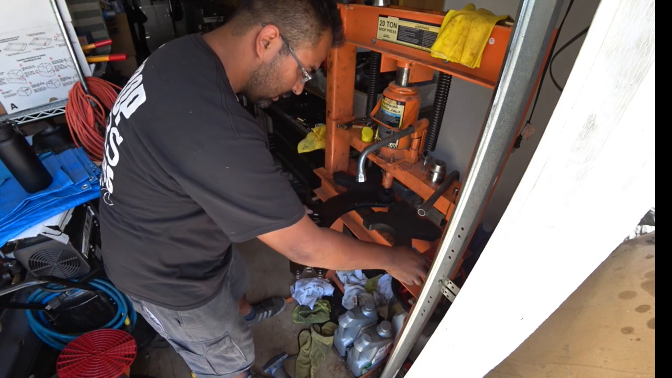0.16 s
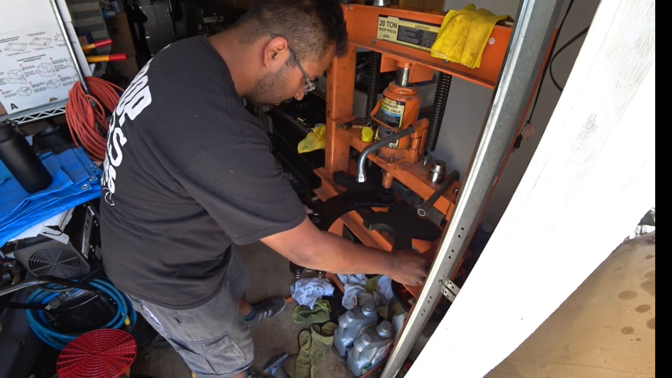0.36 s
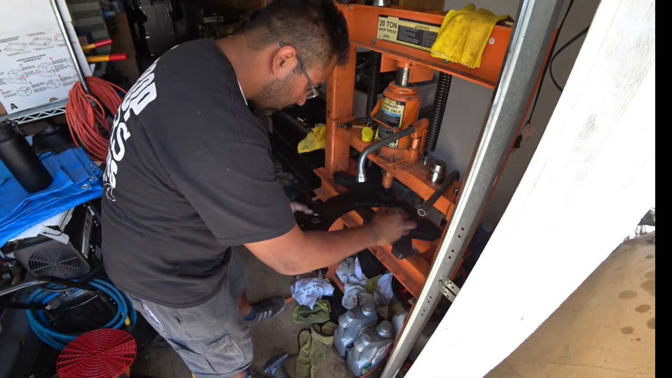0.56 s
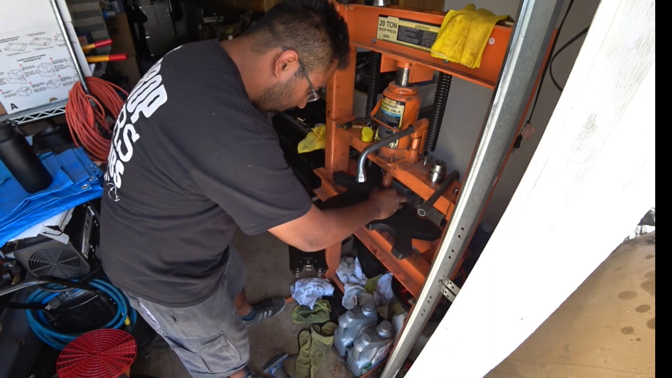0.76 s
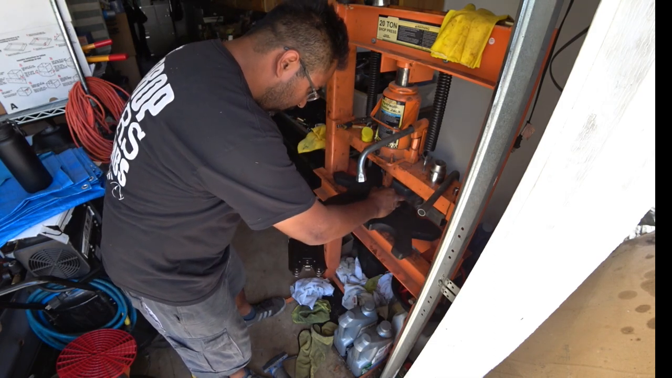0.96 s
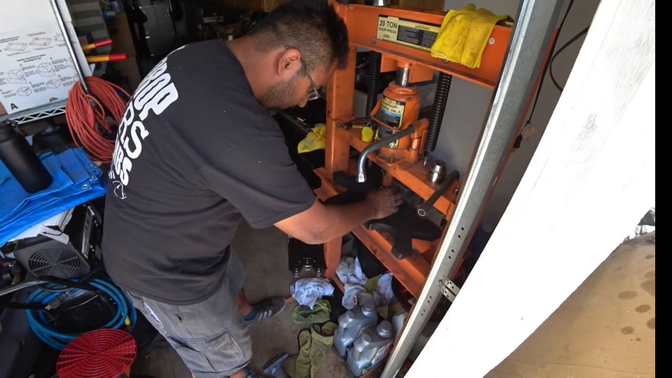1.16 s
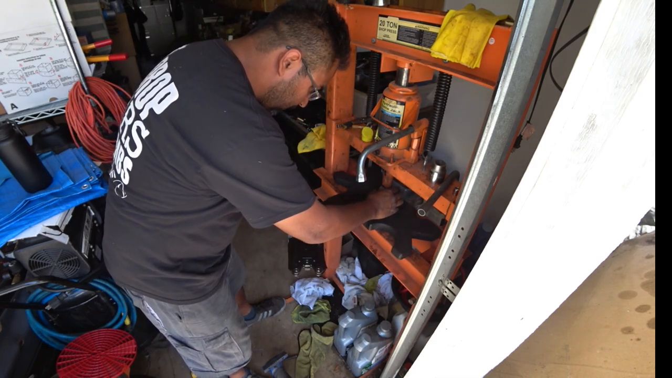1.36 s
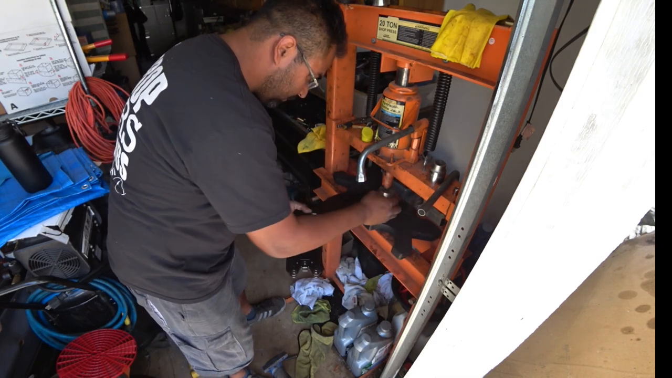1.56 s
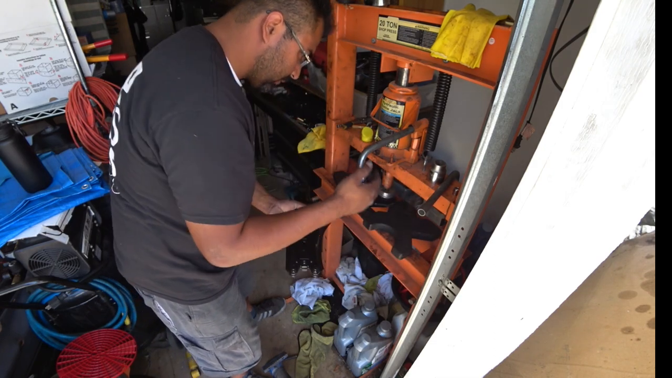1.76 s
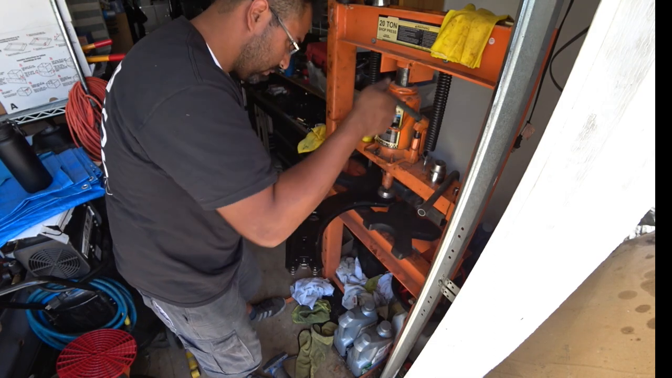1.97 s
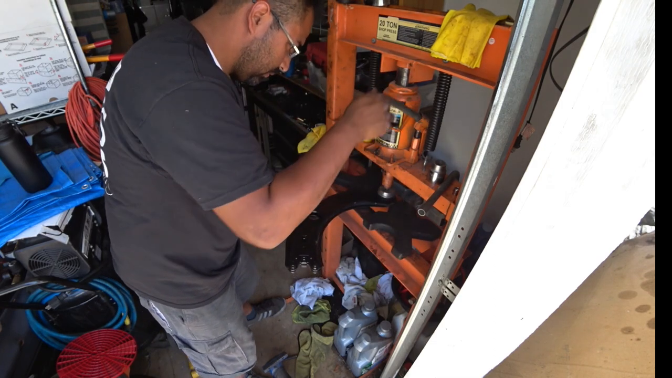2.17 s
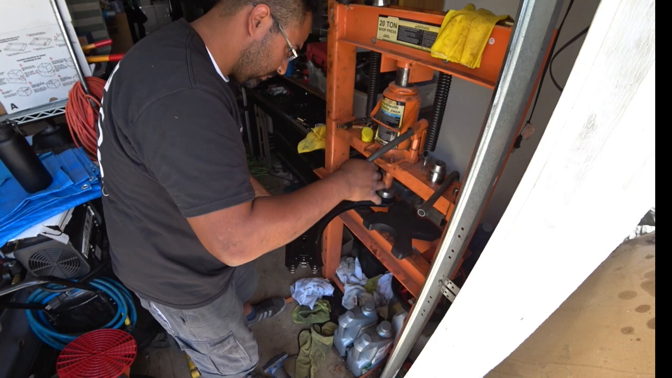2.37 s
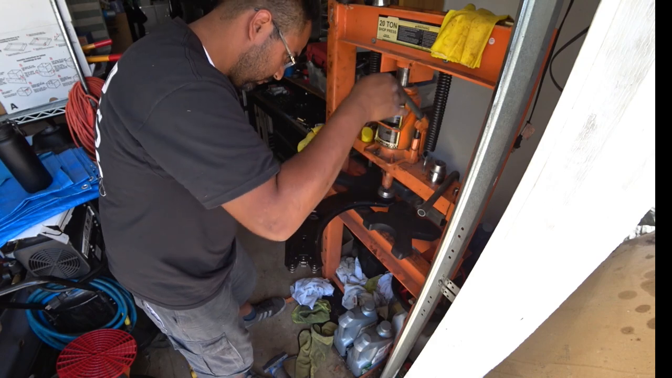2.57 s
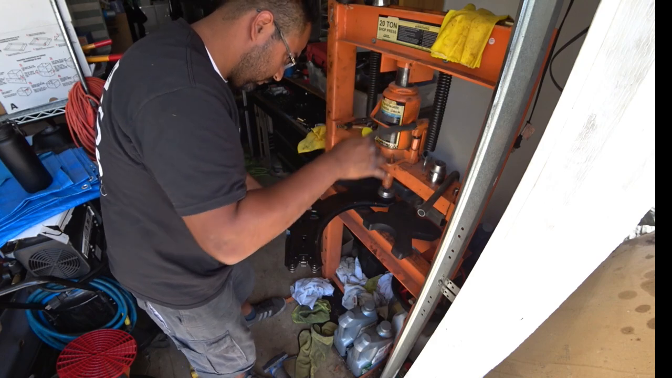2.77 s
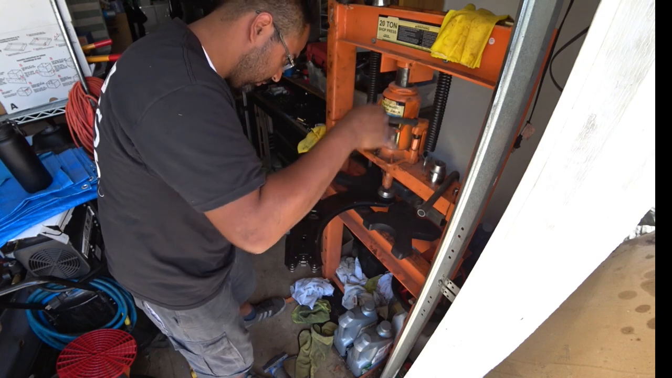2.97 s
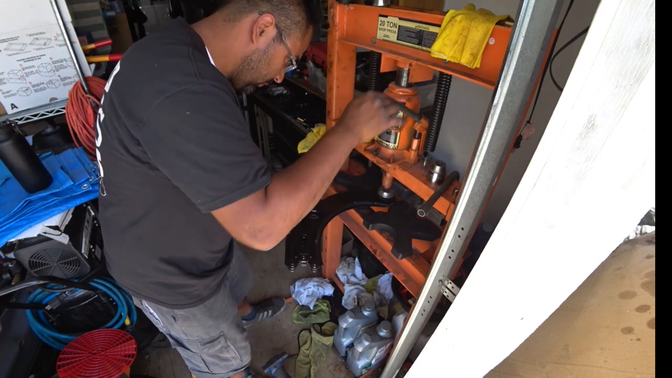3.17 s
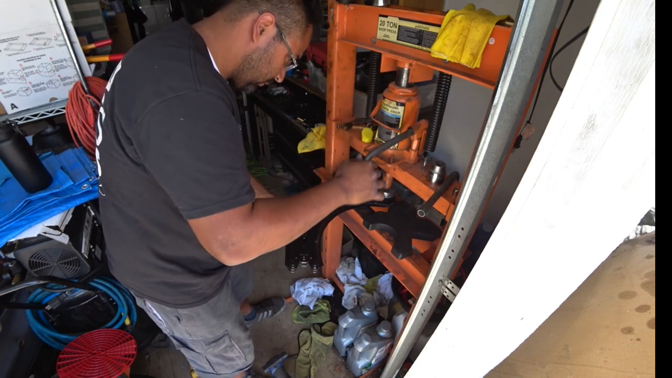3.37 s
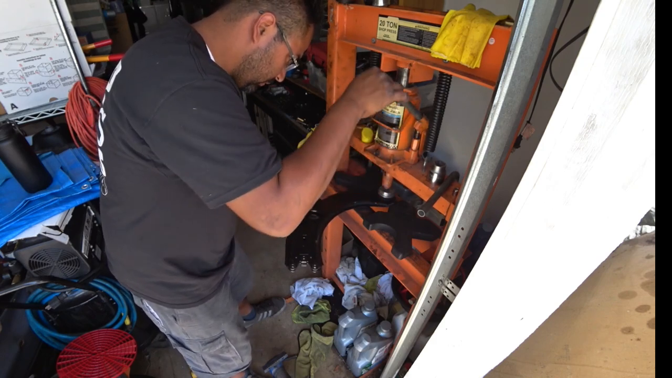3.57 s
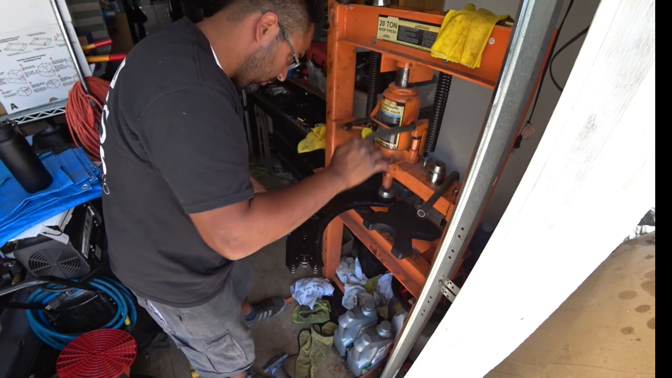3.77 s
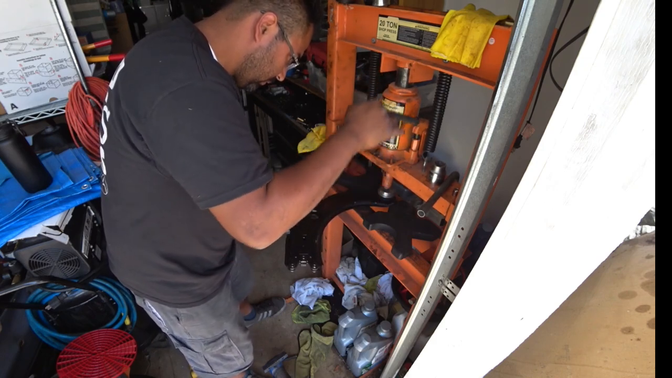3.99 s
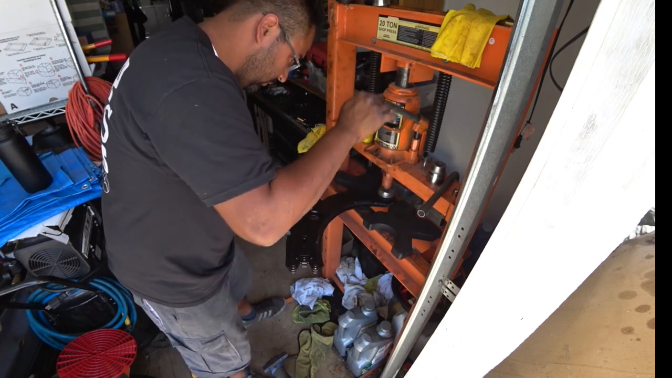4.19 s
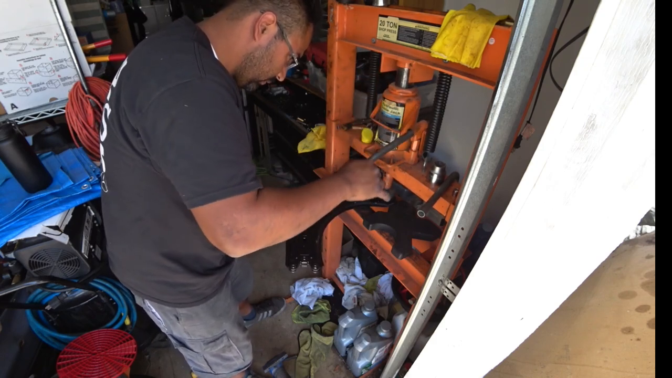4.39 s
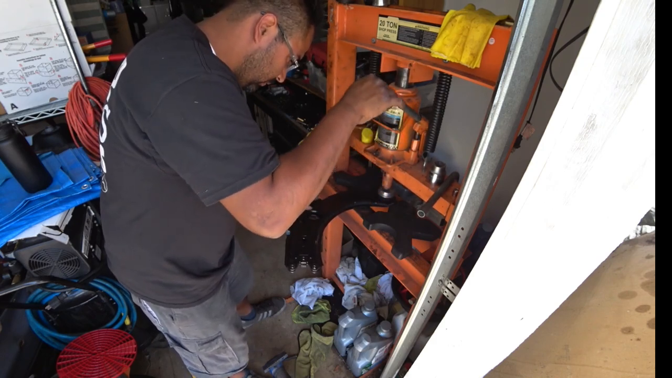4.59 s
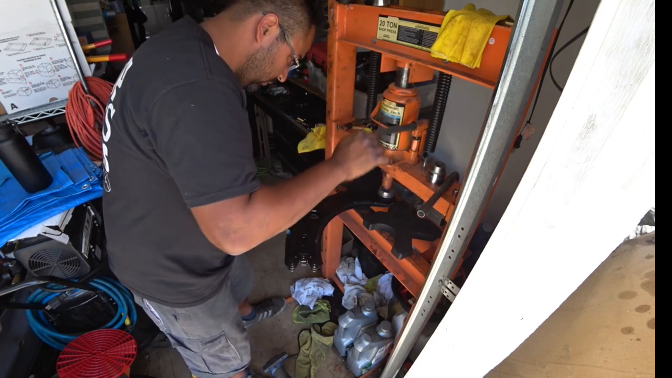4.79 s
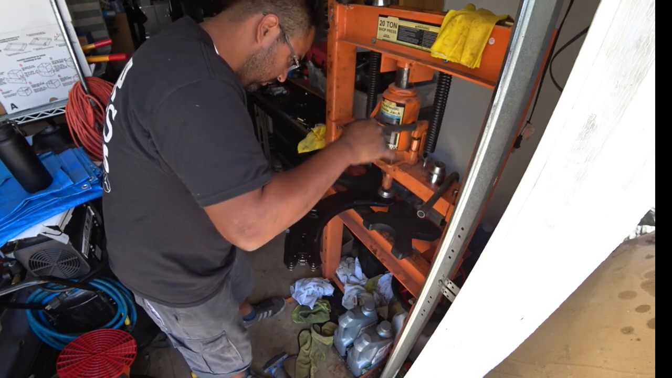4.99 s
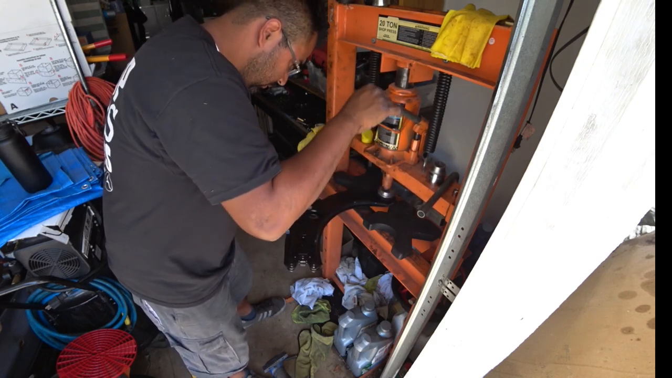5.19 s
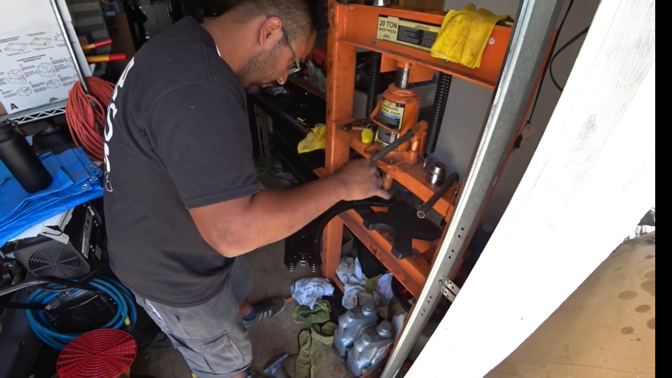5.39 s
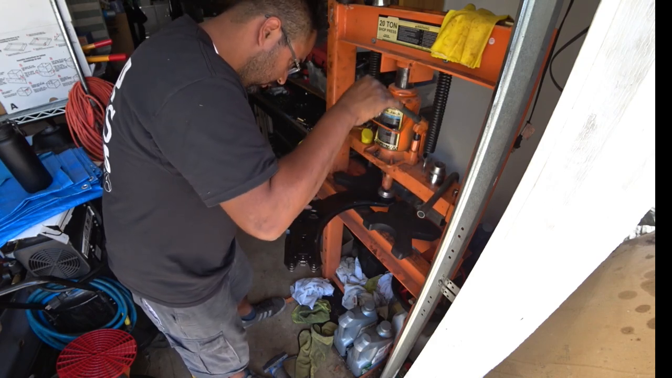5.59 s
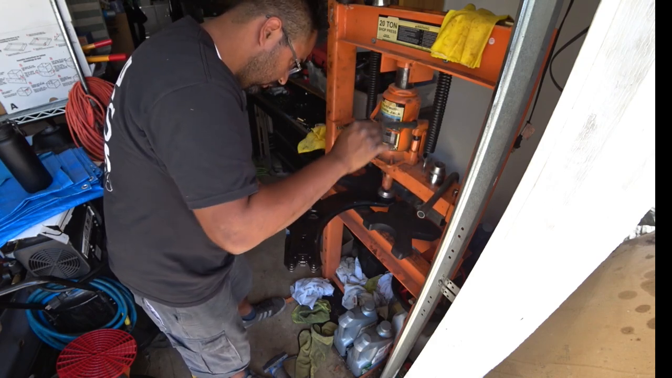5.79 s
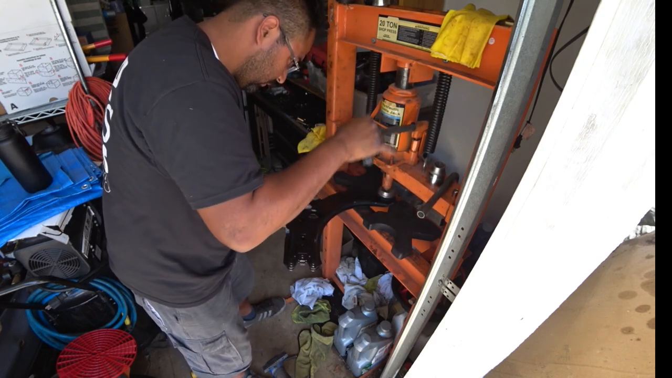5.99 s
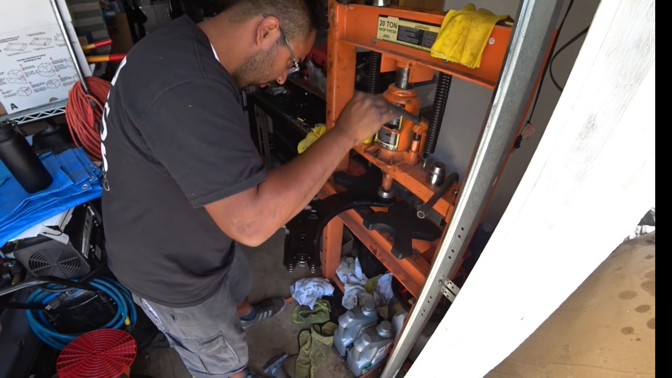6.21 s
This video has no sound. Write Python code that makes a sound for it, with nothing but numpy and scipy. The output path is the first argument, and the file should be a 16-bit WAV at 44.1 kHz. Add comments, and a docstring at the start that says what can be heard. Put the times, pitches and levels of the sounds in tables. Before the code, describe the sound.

A faint scrape, a few muffled thumps and a bright clank of steel come first. Then irregular sharp ticks as a bar is fitted into a bottle jack, growing into regular pumping with strong clacks and a scrape-and-click fallback after each. Stereo pickup at close range, short dense garage echoes, a thin metallic hum of springs lingering, soft room air beneath.

```python
"""Pumping a shop press

A man sets steel down on the bed of a shop press in a small garage: a slide, dull bumps and a plate's clank.
He fits a bar into the bottle jack and pumps; the bar rattles in its socket and knocks at each stroke's end.
Contacts are shaped noise bursts with dense garage echoes; jack, plate and frame ring as sums of decaying sines.
The frame and its return springs, the latter as narrow-band noise, sing on over soft air and a faint hum."""
import sys
import numpy as np
from scipy import signal
from scipy.fft import rfft, irfft
from scipy.io import wavfile

SR = 44100
rng = np.random.default_rng(int(sys.argv[2]) if len(sys.argv) > 2 else 0)


def digitize_waveform(pressure):
    """Quantize a signal to 16-bit integers and store it at the path in sys.argv[1].

    Rows of a 2-D input are taken as channels; values are limited to [-1, 1].
    """
    field = np.atleast_2d(pressure).T
    bounded = np.clip(field, -1, 1)
    quanta = np.round(bounded * 32767).astype(np.int16)
    wavfile.write(sys.argv[1], SR, quanta)


N = 275625

SIZE = 8192  # length of one burst, samples
TIME = np.arange(N) / SR
FREQ = np.maximum(np.fft.rfftfreq(SIZE, 1 / SR), 1)
FULL_FREQ = np.maximum(np.fft.rfftfreq(N, 1 / SR), 1)


def undb(db):
    """Decibels to gain."""
    return 10 ** (np.asarray(db) / 20)


def unit(x):
    """Scale to energy 1."""
    return x / np.sqrt(np.sum(x ** 2))


def curve(points, hz):
    """Read (Hz, dB) points on a log-frequency axis."""
    point_hz, point_db = np.transpose(points)
    return np.interp(np.log(hz), np.log(point_hz), point_db)


def causal(db):
    """Minimum-phase response of a gain curve on FREQ, so that filtering smears nothing ahead of a blow."""
    cepstrum = irfft(np.log(undb(db)))
    cepstrum[1:SIZE // 2] *= 2
    cepstrum[SIZE // 2 + 1:] = 0
    return np.exp(rfft(cepstrum))


def add(track, s, x):
    """Mix x into every channel of the track at time s."""
    i = int(s * SR)
    track[:, i:i + x.shape[-1]] += x[..., :max(N - i, 0)]


def through(x, response):
    """Pass x through an impulse response."""
    return signal.fftconvolve(x, response)


def fade(t, t60):
    """Exponential decay, 60 dB down after t60 seconds."""
    return np.exp(-np.log(1000) * t / t60)


def ring(modes, length_s):
    """Impulse response of damped modes, with alternating signs."""
    t = TIME[:int(length_s * SR)]
    out = np.zeros(len(t))
    for k, (hz, db, t60) in enumerate(modes):
        out += (-1) ** k * undb(db) * fade(t, t60) * np.sin(2 * np.pi * hz * t)
    return out


def crowd(count, lo_hz, hi_hz, db, t60):
    """Many weak modes scattered at random, evenly in pitch, over a band."""
    return [(lo_hz * (hi_hz / lo_hz) ** place, db, t60) for place in rng.random(count)]


# Low, middle and high band in which the strength of a blow is set.
# Each row: lower edge in Hz, upper edge in Hz.
LEVEL_BANDS = [(300, 1900), (2400, 5000), (5500, 11000)]


def blow(colour, levels_db, contact_ms, ping_hz=1000, ping_db=0, ping_width=1, grit=0.17, attack_share=0.14):
    """A fast-dying burst of tiny contacts, with one resonance that depends on where it lands."""
    t_ms = 1000 * TIME[:SIZE]
    noise, size = rng.standard_normal((2, SIZE))
    # longer contacts die away more slowly and also take longer to build up
    attack = 1 - np.exp(-t_ms / (attack_share * contact_ms))
    force = np.exp(-t_ms / contact_ms) * attack
    grains = noise * np.exp(grit * size)
    ping = ping_db / (1 + (np.log(FREQ / ping_hz) / ping_width) ** 2)
    spectrum = rfft(grains * force) * causal(curve(colour, FREQ) + ping)
    # bring each band to its level, as mean power over 10 ms
    have_db = []
    for lo, hi in LEVEL_BANDS:
        energy = np.sum(abs(spectrum[(FREQ > lo) & (FREQ < hi)]) ** 2) * 2 / SIZE
        have_db.append(10 * np.log10(energy / (.01 * SR)))
    tint_db = np.interp(FREQ, np.ravel(LEVEL_BANDS), np.repeat(np.subtract(levels_db, have_db), 2))
    return irfft(spectrum * causal(tint_db))


def dulled(db, dull_db):
    """Low, middle and high level of a soft blow: each band lies dull_db under the one below."""
    return db - dull_db * np.arange(3)


def garage(x, wet_db=-2, t60_low=0.24, t60_high=0.11, split_hz=3000, build_s=0.00041, spread=0.36):
    """Dense echoes from nearby clutter: a new pattern on each call, partly shared by left and right."""
    t = TIME[:2 * SIZE]
    noise = rng.standard_normal((2, len(t)))
    low = signal.lfilter(*signal.butter(1, split_hz, fs=SR), noise)
    high = noise - low
    tails = low * fade(t, t60_low) + high * fade(t, t60_high)
    tails *= 1 - np.exp(-t / build_s)
    mid, side = (undb(wet_db) * unit(tail) for tail in tails)
    mid[0] += 1  # the direct sound
    return np.array([through(x, mid + spread * side), through(x, mid - spread * side)])


# Colour of the still air in the garage.
# Each row: frequency in Hz, relative level in dB per Hz.
AIR_COLOUR = [(18, -47), (30, -23), (146, -15), (373, -2), (953, 0), (1050, 1.5), (1810, -8),
              (11000, -20.5), (14300, -68), (22000, -120)]
AIR_DB = -59.5  # RMS of the part common to both channels


def air(side_share, hum_hz, hum_db):
    """Soft steady background: wide filtered noise with a faint sine hum."""
    gain = undb(curve(AIR_COLOUR, FULL_FREQ))
    mid, side = (irfft(rfft(noise) * gain, N) for noise in rng.standard_normal((2, N)))
    hiss = (mid + side_share * np.array([side, -side])) / mid.std()
    hum = undb(hum_db) * np.sin(2 * np.pi * hum_hz * TIME)
    return undb(AIR_DB) * hiss + hum


def slide(length_s=0.66, hz=3550, db=-64):
    """Steel drags faintly over the bed: spiky noise grains as a resonant squeak and a high-passed rasp."""
    t = TIME[:int(length_s * SR)]
    swell = np.sin(np.pi * np.sqrt(t / t[-1])) ** 2  # fullest a quarter of the way in
    grains = rng.standard_normal(len(t)) ** 3 * swell
    squeak = signal.lfilter(*signal.iirpeak(hz, 7, fs=SR), grains)
    rasp = signal.lfilter(*signal.butter(2, 1500, "high", fs=SR), grains)
    return undb(db) * (squeak + 0.36 * rasp)


# Dull bumps of things shifted on the bed.
# Each row: start in seconds, low-band level in dB, contact in ms, hollow note in Hz, dullness in dB per band.
BED_BUMPS = [(.286, -36, 13, 1186, 14), (.38, -50, 20, 825, 8), (1.018, -39.5, 4.8, 605, 25),
             (1.138, -51.5, 5.3, 607, 27), (6.156, -44.5, 7.3, 1160, 8.5)]
# Colour of the bumps. Each row: frequency in Hz, level in dB.
BUMP_TONE = [(100, -47), (400, -14), (700, -2.5), (1700, -5), (2400, -1.5), (2900, -7), (11000, -39)]
# the hollow bed answers a bump with a second, lower note
UNDERTONE_RATIO, UNDERTONE_DB = 0.668, -8.5
# Steel plate set down on the bed.
# One row: low level in dB, middle level in dB, high level in dB, contact in ms.
PLATE_CLANK = (-32, -34.5, -50, 6)
# Colour of the clank. Each row: frequency in Hz, level in dB.
PLATE_TONE = [(60, -60), (450, -30.5), (750, -14), (1700, -3.5), (2900, -1), (4200, 2), (5500, -10),
              (11000, -26)]
# Modes of the plate. Each row: frequency in Hz, relative level in dB, 60 dB decay in seconds.
PLATE_MODES = [(740, -2.5, .12), (1099, 0, 0.26), (1553, 4.5, 0.11), (1720, 3.5, 0.065), (1845, -11, 0.87),
               (2065, 4.5, 0.18), (2620, -6, 0.22), (5780, -13, 0.2), (7000, -18, 0.36)]
CLANK_S = .7886


def bed():
    """A slide, dull hollow bumps and one ringing clank of the plate."""
    out = np.zeros((2, N))
    add(out, 0.039, garage(slide()))
    for s, db, contact_ms, hz, dull_db in BED_BUMPS:
        levels_db = dulled(db, dull_db)
        # the duller the bump, the more its hollow note stands out
        bump = blow(BUMP_TONE, levels_db, contact_ms, hz, ping_db=1.12 * dull_db, ping_width=0.11, grit=0.32)
        under = blow(BUMP_TONE, levels_db, contact_ms, UNDERTONE_RATIO * hz,
                     ping_db=dull_db, ping_width=0.075, grit=0.19)
        add(out, s, garage(bump + undb(UNDERTONE_DB) * under))
    *levels_db, contact_ms = PLATE_CLANK
    add(out, CLANK_S, garage(blow(PLATE_TONE, levels_db, contact_ms, attack_share=0.017)))
    weak_modes = crowd(count=14, lo_hz=3390, hi_hz=5250, db=-27.5, t60=0.93)
    add(out, CLANK_S, undb(-34.0) * ring(PLATE_MODES + weak_modes, 1))
    return out


def springs(centre_hz, width_hz, t60):
    """Coil springs hold a crowd of modes in one narrow band, made here from fading band noise."""
    hz = np.fft.rfftfreq(N, 1 / SR)
    band = 1 / (1 + ((hz - centre_hz) / width_hz) ** 4)
    shimmer = irfft(rfft(rng.standard_normal(N)) * band, N)
    return shimmer / shimmer.std() * fade(TIME, t60)


# Long modes of the frame. Each row: frequency in Hz, relative level in dB, 60 dB decay in seconds.
FRAME_MODES = [(1073, 4, 3.1), (1120, -7.5, 6), (1155, -1, 3.4)]


def press():
    """The clank and the knocks leave the frame and its springs singing, louder after harder knocks."""
    out = np.zeros((2, N))
    frame = ring(FRAME_MODES, N / SR)
    add(out, CLANK_S, undb(-48.0) * frame + undb(-48) * springs(centre_hz=1313, width_hz=89, t60=2.13))
    for s, db, *_ in LEVER_KNOCKS:
        song = undb(db - 26.5) * springs(centre_hz=1338, width_hz=89, t60=5.2)
        add(out, s, undb(db - 29.0) * frame + song)
    return out


# Modes of the jack and its bar. Each row: frequency in Hz, relative level in dB, 60 dB decay in seconds.
JACK_MODES = [(1884, -8, .25), (2051, 2, .4), (2966, -2, .18), (3214, -4, .36), (3270, -4, .42),
              (3994, 3, .18), (4118, -7, .4), (4322, -5, .4), (4511, -4, .5), (4727, 0, .5), (5076, 0, .34),
              (5599, 0, .22), (6471, 3, .18), (6648, 2, .18), (7176, -15, .45), (7983, -14, .45)]


def jack_body():
    """The main modes of the jack among a crowd of weaker ones; the hand on the bar keeps every ring short."""
    return ring(JACK_MODES + crowd(count=40, lo_hz=2730, hi_hz=8850, db=-26, t60=0.85), 1)


# a click is brighter the higher it pings, and has more body the longer the contact
EVEN_HZ, BRIGHT_DB_PER_OCTAVE = 5000, 5
CLICK_BODY_DB, BODY_DB_PER_DOUBLING = -18.5, 2.5  # body of a 1 ms contact against the click's level


def click_levels(db, contact_ms, hz):
    """Low, middle and high level of a click, from its strength, contact time and ping."""
    tilt_db = BRIGHT_DB_PER_OCTAVE * np.log2(hz / EVEN_HZ)
    body_db = CLICK_BODY_DB + BODY_DB_PER_DOUBLING * np.log2(contact_ms)
    return db + body_db, db - tilt_db / 2, db + tilt_db / 2


# a loose bar hops once after the knock, then scrapes and falls back: (level dB, contact ms, ping Hz)
HOP_S, HOP = .046, (-39.5, 1.4, 3800)
SCRAPE = (-35, 7.8, 2800)
FALL = (-27.5, 4.4, 8550)


def all_clicks():
    """Every click of the bar in order: its own, and the hop and fall after each loose stroke."""
    clicks = list(BAR_CLICKS)
    for s, *_, fall_s in LEVER_KNOCKS:
        if fall_s > HOP_S:
            clicks += [(s + HOP_S, *HOP), (s + fall_s, *FALL)]
    return sorted(clicks)


# as the hand turns round, the bar ticks faintly through its slack before a click that follows a pause
PUMPING_FROM_S, PAUSE_S = 2.8, .13
SLACK_S, SLACK = 0.022, (-54.5, 1.8, 2600)  # longest lead; (level dB, contact ms, ping Hz)


def slack(count=2):
    """Once the bar is seated, faint ticks lead into the first click after each pause."""
    out, last_s = np.zeros((1, N)), 0
    for s, *_ in BAR_CLICKS:
        if s > PUMPING_FROM_S and s - last_s > PAUSE_S:
            for lead in rng.random(count):
                # the ping only sets the brightness here
                add(out, s - SLACK_S * lead, blow(CLICK_TONE, click_levels(*SLACK), SLACK[1]))
        last_s = s
    return garage(out[0])[:, :N]


def chatter(count=2, spread_s=0.014, below_db=-15, scatter_db=1.0):
    """The loose bar bounces in small stray ticks after each click."""
    out = np.zeros((1, N))
    for s, db, contact_ms, hz in all_clicks():
        for when, size in rng.standard_normal((count, 2)):
            tick = blow(CLICK_TONE, click_levels(db, contact_ms, hz), 0.91, hz)
            gain_db = below_db + scatter_db * np.tanh(size)
            add(out, s + spread_s * abs(when), undb(gain_db) * tick)
    return garage(out[0])[:, :N]


# The bar clicking in its socket.
# Each row: start in seconds, level in dB, contact in ms, ping in Hz.
BAR_CLICKS = [(1.8817, -43, 4.2, 6360), (1.9206, -28, 2.15, 4120), (2.0689, -40.5, 0.69, 2850),
              (2.0863, -40.5, 2.7, 2920), (2.182, -29.5, 1.4, 4560), (2.3707, -39.5, 7.7, 2750),
              (2.4599, -36, 1.7, 3950), (2.4994, -27.5, 1.1, 3740), (2.564, -36.5, 7.9, 3200),
              (2.6375, -42, 0.85, 2760), (2.6439, -37, 0.6, 2900), (2.6980, -34, 2.5, 3800),
              (2.7434, -34.5, 1.3, 7660), (2.9498, -40.5, 1.5, 10500), (2.9776, -29.5, 2.85, 4100),
              (3.2005, -33, 1.24, 4330), (3.4472, -37, 6.53, 3820), (3.4704, -35, 5.5, 4950),
              (3.7337, -32, 1.5, 7100), (4.2333, -44, 4.7, 2942), (4.5758, -36, 6.3, 3090),
              (4.7492, -36, 7, 7500), (5.2599, -31, 6.8, 7250), (5.281, -36, 2.1, 7000),
              (5.6091, -34, 5.6, 3100), (5.751, -46, 0.63, 2850), (5.778, -44, 5.8, 6560),
              (5.808, -32, 11.3, 7660), (5.9875, -43.5, 3.5, 2860), (6.002, -39.5, 3.9, 6550),
              (6.0184, -31, 2.5, 8200)]
# Colour of the clicks. Each row: frequency in Hz, level in dB.
CLICK_TONE = [(100, -48.5), (400, -25.5), (1400, -14), (2400, -7.5), (2950, 3), (4100, 2), (4650, -3.5),
              (6500, -1.5), (7050, -2.5), (8400, -1.5), (9100, -5.5), (11000, -6)]
# How freely the jack rings as the hand loosens on the bar.
# Each row: time in seconds, relative level in dB.
RING_FREEDOM = [(2.5, -5), (5.5, 2.5)]


def rattle(jack, lead_db=-10, lead_ms=4.0):
    """The bar clicks against its socket and rings the jack."""
    out, last_s = np.zeros((2, N)), 0
    for s, db, contact_ms, hz in all_clicks():
        levels_db = click_levels(db, contact_ms, hz)
        click = blow(CLICK_TONE, levels_db, contact_ms, hz, ping_db=8, ping_width=0.047, grit=0.34)
        # a bar that is still bouncing, or lands at a slant, scrapes before it clicks
        if s - last_s < .045 or contact_ms > 8:
            scrape = blow(CLICK_TONE, levels_db, lead_ms, grit=0.95)[::-1]  # reversed: swells into the click
            add(out, s - SIZE / SR, undb(lead_db) * scrape)
        add(out, s, garage(click))
        freedom_db = np.interp(s, *np.transpose(RING_FREEDOM))
        add(out, s, undb(freedom_db - 52.0) * through(click, jack))
        last_s = s
    return out


# The pump lever meeting its stop, about twice a second. # Each row: start in seconds, level in dB, body in dB
# against that level, contact in ms, # seconds until the bar falls back (0 or anything up to HOP_S adds no hop
# or fall here).
LEVER_KNOCKS = [(2.2239, -39, -4, 16, 0.042), (2.4142, -32, -3.5, 7.3, 0), (2.751, -35.5, -3.5, 11, 0),
                (3.2460, -35, -1.5, 12, 0), (3.7539, -45, 1, 8.4, 0), (3.8929, -23, -5.5, 7, .0925),
                (4.4243, -25.5, -6, 5.1, .0825), (4.9315, -26, -5, 4.6, 0.087),
                (5.4515, -26.5, -7, 5.6, .075)]
# Colour of the knocks. Each row: frequency in Hz, level in dB.
KNOCK_TONE = [(100, -36), (230, -19.5), (500, -6.5), (640, -3.5), (900, 4), (2900, 4), (4700, 0.5),
              (6100, -1), (6900, -8), (7600, -1.5), (9400, -11.5), (10800, -8.5)]
# a knock is brighter the harder it lands; the lever then seats with a second, duller contact
HARD_DB, BRIGHT_DB_PER_DB = -27, 0.13
SEAT_S, SEAT_DB, SEAT_DULL_DB = 0.0055, -1.5, 6.5


def strokes(jack):
    """The lever knocks on its stop with the weight of the arm behind it, and a loose bar slides back."""
    out = np.zeros((2, N))
    # the heavy, blunt blow wakes mostly the lower modes of the jack
    blunt = signal.lfilter(*signal.butter(1, 3000, fs=SR), jack)
    for s, db, body_db, contact_ms, fall_s in LEVER_KNOCKS:
        levels_db = db + np.array([body_db, 0, BRIGHT_DB_PER_DB * (db - HARD_DB)])
        seat_db = levels_db + dulled(SEAT_DB, SEAT_DULL_DB)
        knock = blow(KNOCK_TONE, levels_db, contact_ms, grit=0.46, attack_share=0.053)
        seat = blow(KNOCK_TONE, seat_db, contact_ms, grit=0.21, attack_share=0.052)
        add(out, s, garage(knock))
        add(out, s + SEAT_S, garage(seat))
        add(out, s, undb(db - 8.5) * blunt)
        if fall_s > HOP_S:
            scrape = blow(CLICK_TONE, click_levels(*SCRAPE), *SCRAPE[1:], ping_db=5, ping_width=0.048, grit=1.0)
            # reversed, so that it swells into the fall
            add(out, s + fall_s - SIZE / SR, garage(scrape[::-1]))
    return out


# The press stands to the left, which shows most in the treble.
# Each row: frequency in Hz, left minus right in dB.
LEFT_LEAN = [(200, .5), (8000, 3.5)]


def scene():
    """The press, a little to the left, over the still air."""
    jack = jack_body()
    near = bed() + press() + slack() + chatter() + rattle(jack) + strokes(jack)
    lean_db = curve(LEFT_LEAN, FULL_FREQ)
    placed = irfft(rfft(near) * undb(np.array([lean_db, -lean_db]) / 2), N)
    return placed + air(side_share=0.86, hum_hz=86.0, hum_db=-88.5)


TOP_HZ = 11050


def record(dry):
    """A steep elliptic low-pass cuts the top off the sound."""
    return signal.sosfilt(signal.ellip(10, .2, 70, TOP_HZ, fs=SR, output="sos"), dry)


dry = scene()
out = record(dry)
digitize_waveform(out)
```